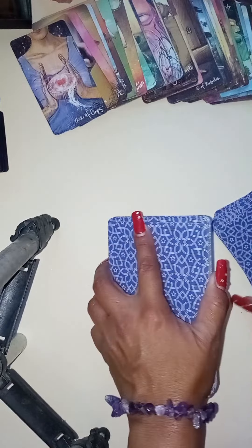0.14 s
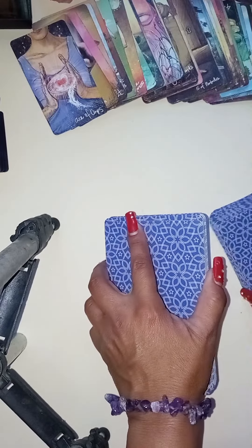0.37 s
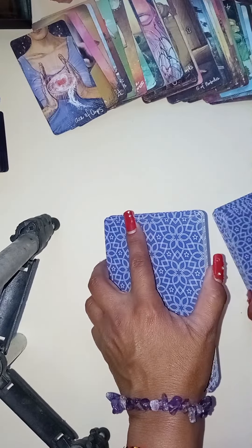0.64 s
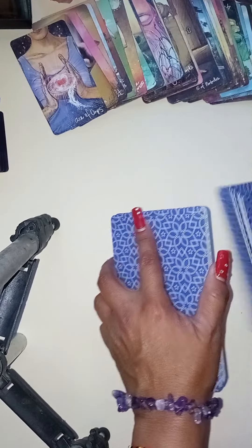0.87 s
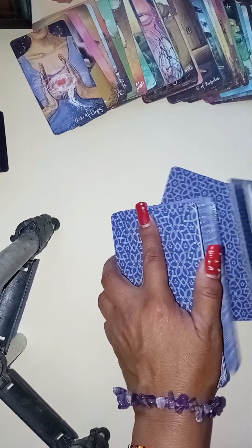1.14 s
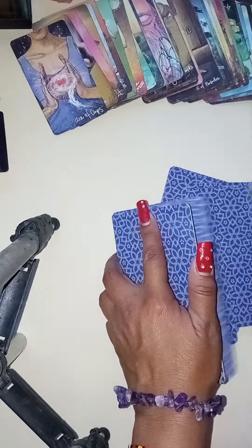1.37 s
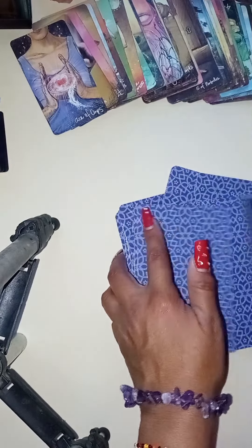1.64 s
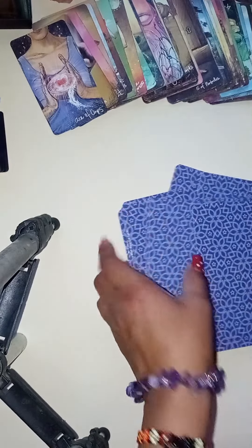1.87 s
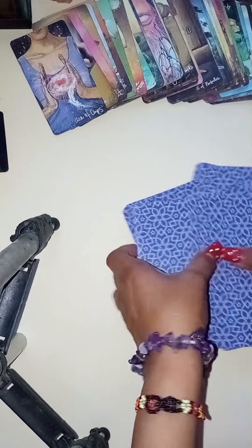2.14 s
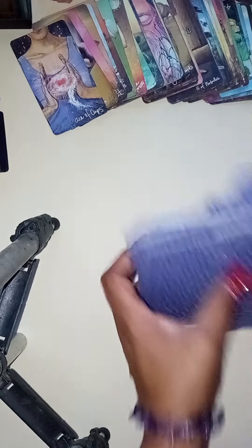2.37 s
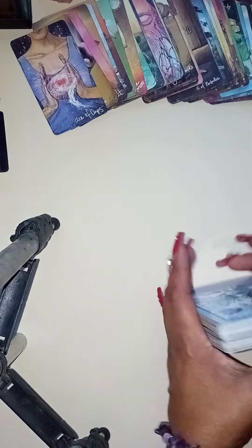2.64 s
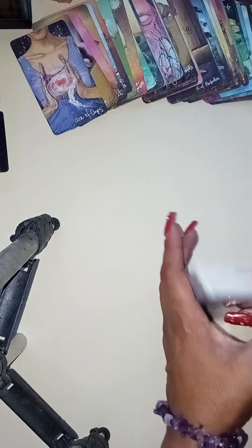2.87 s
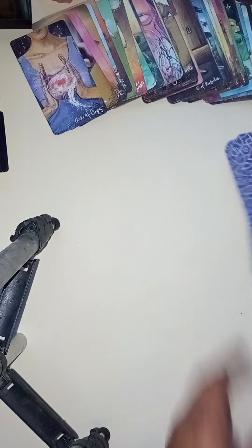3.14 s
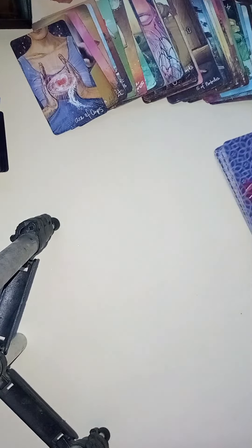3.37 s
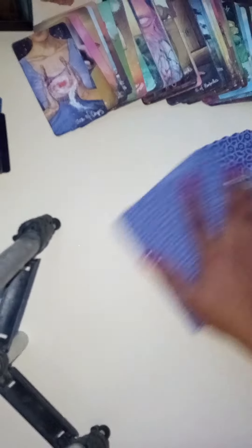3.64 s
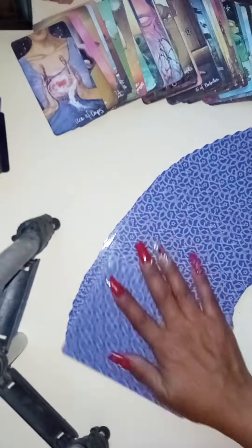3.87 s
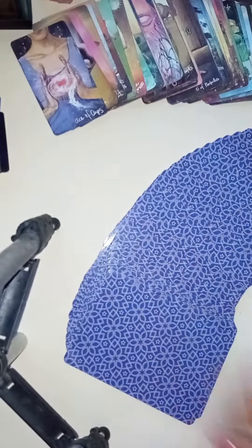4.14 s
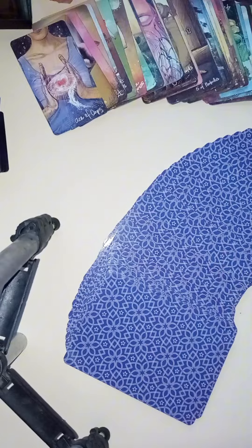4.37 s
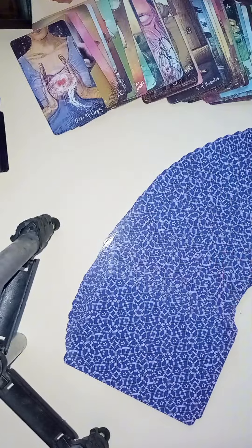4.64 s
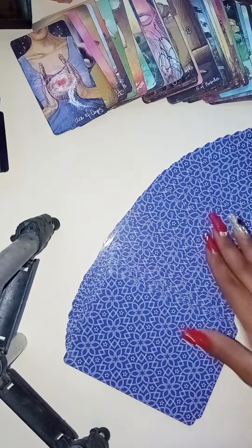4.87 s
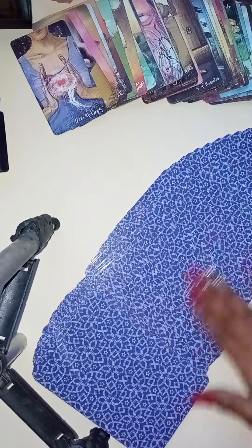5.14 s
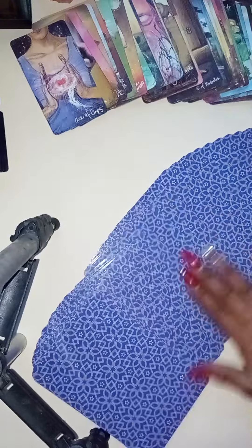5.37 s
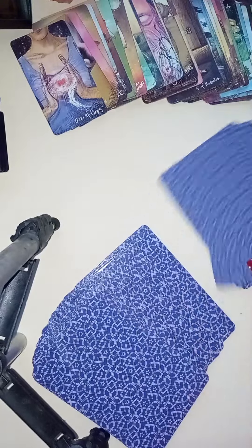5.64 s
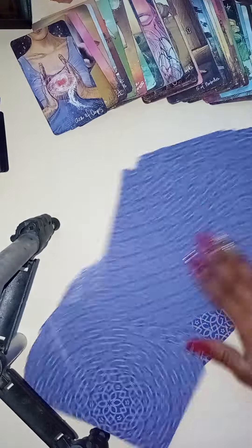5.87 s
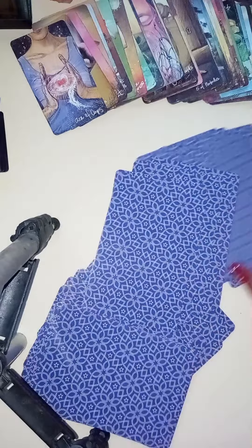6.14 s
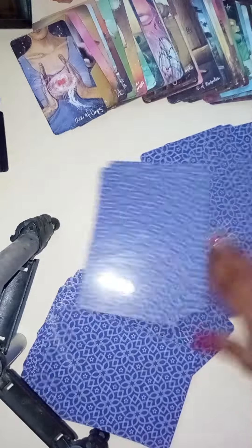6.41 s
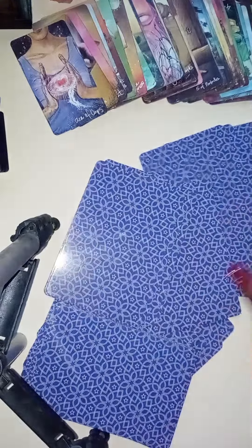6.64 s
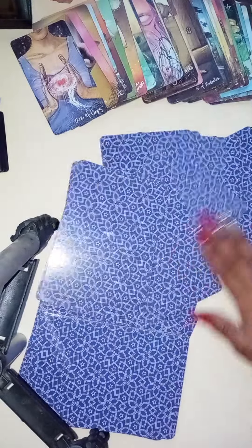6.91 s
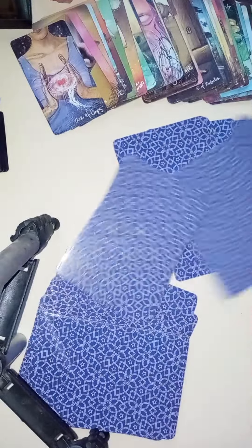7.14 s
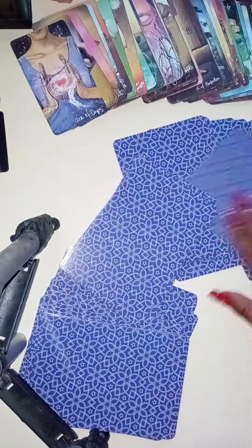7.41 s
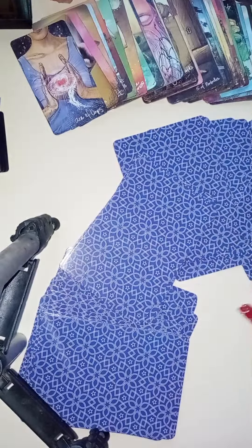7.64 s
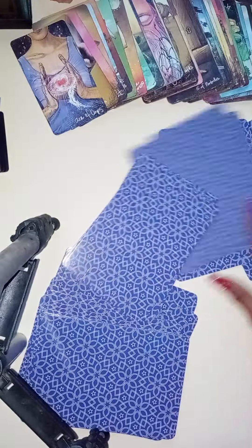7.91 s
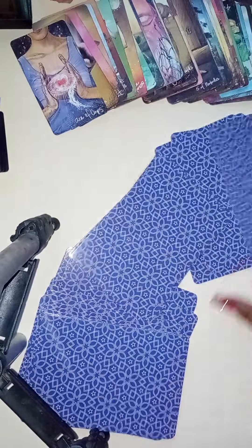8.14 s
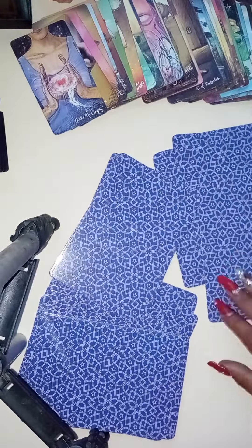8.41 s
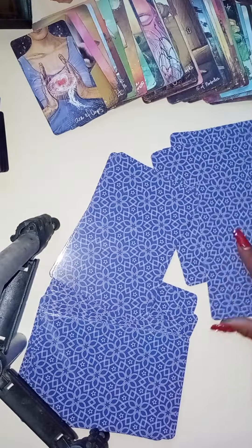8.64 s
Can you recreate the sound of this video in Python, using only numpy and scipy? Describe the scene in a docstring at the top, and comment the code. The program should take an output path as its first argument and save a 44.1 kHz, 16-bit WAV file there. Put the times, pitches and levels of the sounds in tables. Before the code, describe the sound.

A small parakeet chirps, warbles and squawks across a hard, echoing room while a card deck is knocked square, swept and fanned on a table close by.

```python
"""A faint room hush and hum come first; then a small parakeet warbles, buzzes and squawks across a hard room.
Close by, a card deck is riffled, squared against the table and fanned out; the table top booms under knocks.
The bird is made of gliding tones and, for its squawks, rough noise; the rubbing cards are bursts of
gritty noise; each knock sets decaying tones ringing; the hush is shaped noise and the hum a steady tone."""
import sys
import numpy as np
from scipy import signal
from scipy.fft import rfft, irfft
from scipy.io import wavfile
from scipy.ndimage import uniform_filter1d

SR = 44100
rng = np.random.default_rng(int(sys.argv[2]) if len(sys.argv) > 2 else 0)


def boost(x):
    """Linear amplitude factor 10**(x/20) for a level x in decibels (scalar or array-like)."""
    u = np.asarray(x, float) / 20
    return 10 ** u


def wav_record(signal):
    """Record a signal, one row per channel, as 16-bit PCM in the file named by sys.argv[1]."""
    frames = np.transpose(np.atleast_2d(signal))
    bounded = np.clip(frames, -1, 1)
    # unit amplitude maps onto the largest positive 16-bit level
    quanta = np.round(bounded * 32767).astype(np.int16)
    wavfile.write(sys.argv[1], SR, quanta)


N = 386757
TIME = np.arange(N) / SR  # seconds

# Swoops glide straight, loudest on arrival, then are held and fade:
# (start [s], glide [s], held [s], from pitch [Hz], to pitch [Hz], level on arrival [dB])
SWOOPS = [(0.25, 0.051, 0.27, 3150, 2620, -34.5), (0.492, 0.041, 0.0014, 4290, 3370, -31.5),
          (.548, 0.025, 0.012, 4300, 5030, -36), (0.583, 0.035, 0.018, 4960, 3880, -28.5),
          (1.765, 0.025, 0.066, 3400, 3633, -28), (2.045, 0.0093, 0.001, 5650, 3650, -28.5),
          (2.361, 0.046, 0.095, 4785, 3818, -27.5), (2.713, 0.039, 0.13, 3500, 2834, -35),
          (2.886, 0.063, 0.0022, 4360, 3810, -41.5), (3.095, 0.062, 0.0015, 2853, 3270, -38),
          (3.14, 0.017, 0.004, 2890, 4645, -23), (3.169, 0.025, 0.02, 5190, 3970, -31.5),
          (3.794, 0.04, 0.0021, 2448, 3230, -25), (4.386, 0.021, 0.0025, 2630, 1675, -42.5),
          (4.896, 0.051, 0.016, 4640, 3380, -39), (4.966, 0.042, 0.033, 5110, 4295, -35.5),
          (5.351, 0.037, 0.019, 4085, 3406, -37.5), (5.412, 0.058, 0.023, 4800, 3916, -32.5),
          (5.66, 0.051, 0.0018, 4120, 2770, -30), (5.788, 0.0093, 0.003, 2700, 5100, -35)]
# Steps swell high, drop quickly and settle low:
# (start [s], drop [s], end [s], high pitch [Hz], low pitch [Hz], level at the drop [dB])
STEPS = [(1.503, 1.591, 1.7, 4360, 3253, -23), (1.86, 1.875, 2.0, 3583, 2942, -30.5),
         (2.077, 2.122, 2.27, 3992, 2787, -30), (2.945, 2.959, 3.07, 3673, 2808, -26.5),
         (4.327, 4.342, 4.37, 3810, 2470, -41), (4.42, 4.424, 4.458, 3590, 2450, -36.5),
         (6.882, 6.979, 7.09, 4203, 3410, -26.5)]
# Arches climb to a crest in pitch and level, flick upward and sink back:
# (start [s], crest [s], start pitch [Hz], crest pitch [Hz], flick above it [Hz], level at the crest [dB])
ARCHES = [(.858, 0.921, 3550, 3732, 813.5, -23.5), (1.16, 1.28, 3300, 3830, 938.5, -21.5),
          (3.407, 3.485, 2794, 3400, 90, -27.5), (6.21, 6.284, 3243, 3670, 8, -24.5),
          (6.567, 6.682, 3360, 3715, 990.5, -21)]
# Pips start at full level and die away on one pitch: (start [s], length [s], pitch [Hz], first level [dB])
PIPS = [(.325, 0.054, 2026, -39.5), (1.057, 0.13, 2513, -33.5), (1.86, 0.03, 4260, -30),
        (2.915, 0.12, 2530, -31.5), (3.712, 0.04, 2883, -32.5), (3.824, 0.014, 3717, -17),
        (4.455, 0.064, 2363, -40), (5.706, 0.05, 2735, -30), (6.208, 0.041, 2416, -36.5)]
# Faint overtones of the bird's voice: (multiple of the pitch [times], level against the main tone [dB])
OVERTONES = [(2, -35), (3, -46)]
# Buzzy notes; the swings can pass a little beyond the band:
# (start [s], end [s], bottom of band [Hz], top of band [Hz], level before it breaks up [dB])
BUZZES = [(.81, 0.958, 2037, 3890, -38), (1.395, 1.5, 2067, 4095, -35.5), (1.869, 1.964, 2003, 3040, -41.5),
          (2.675, 2.795, 2677, 3515, -28), (3.276, 3.348, 1990, 3040, -36),
          (3.613, 3.68, 2250, 3263, -36.5), (3.959, 4.03, 2330, 3173, -34.5),
          (4.864, 4.906, 1610, 2623, -47.5), (5.664, 5.835, 1864, 4210, -39.5),
          (6.12, 6.152, 1808, 4085, -39)]
# Harsh calls: (start [s], swell [s], fade [s], level [dB])
SQUAWKS = [(0.629, 0.037, 0.046, -15.5), (2.477, 0.014, 0.069, -18.5), (4.184, 0.031, 0.049, -16.5),
           (5.871, 0.026, 0.073, -16), (6.258, 0.037, 0.064, -18.5)]
# Broad bands of the open throat: (frequency [Hz], relative level [dB])
THROAT = [(1300, -46), (2000, -16.5), (3800, -7.5), (5300, -2.5), (6500, 1), (7600, -16), (10000, -18),
          (12500, -41)]
# Cards rubbing over cards and table:
# (loudest [s], speeding up [s], slowing down [s], level [dB], hand weight: scrape against hiss [dB])
SLIDES = [(1.379, 0.12, 0.39, -43, -20.5), (1.769, 0.021, 0.29, -45.5, -19.5), (2.225, 0.05, 0.068, -44, 6),
          (2.658, 0.056, 0.17, -34.5, 6), (3.36, 0.089, 0.24, -40.5, 1), (3.859, 0.25, 0.14, -27.5, -4),
          (5.17, 0.16, 0.072, -34, -2), (5.598, 0.108, 0.28, -43, -20), (6.219, 0.0634, 0.08, -47.5, -13),
          (6.499, 0.085, 0.048, -36.5, 1), (6.829, 0.092, 0.043, -31, -12.5), (7.16, 0.087, 0.12, -35, -12),
          (7.6, 0.134, 0.12, -49.5, -41), (7.652, 0.037, 0.049, -42, 5.5), (8.06, 0.1, 0.048, -40.5, -26.5),
          (8.38, 0.14, 0.094, -43, -14), (8.71, 0.084, .14, -50, -7.5)]
# Colour of the rubbing hiss: (frequency [Hz], relative level [dB])
RUB = [(500, -15), (1200, -30), (3000, -10.5), (6500, -10), (10000, -15.5), (12500, -34), (15000, -29.5)]
# Card edges and fingers striking; relative levels: (time [s], knock [dB], table boom [dB], edge tick [dB])
TAPS = [(1.073, -21.5, -22.5, -35.5), (1.255, -26, -60.5, -37), (1.327, -10.5, -46, -23.5),
        (1.371, -6.5, -9, -16), (1.382, -9, -12.5, -33.5), (1.405, -34, -35.5, -34.5),
        (1.462, -15.5, -27.5, -26.5), (1.576, -8, -59, -26.5), (1.625, -28, -46, -18),
        (1.729, -16.5, -16, -36), (1.861, -58, -42, -18.5), (2.095, -18.5, -28, -45),
        (2.321, -30.5, -63, -26), (2.354, -32.5, -48, -24.5), (2.623, -8.5, -7, -25.5),
        (2.667, -15, -10.5, -49.5), (2.821, -21.5, -16, -73.5), (2.836, -15.5, -46.5, -37),
        (3.39, -19, -39.5, -39.5), (3.497, -20, -6.5, -85), (5.045, -67, -26, -25),
        (5.201, -11.5, -31.5, -60.5), (5.429, -59, -57, -28), (5.92, -17.5, -41, -45),
        (6.2, -55, -28.5, -71.5), (6.496, -10.5, -31.5, -23), (6.855, -20, -30, -26.5),
        (7.482, -49.5, -21.5, -38), (7.62, -22, -41, -30.5), (7.947, -59, -39, -40),
        (8.006, -27, -80.5, -30), (8.124, -20.5, -43.5, -27.5), (8.249, -45, -29, -33.5),
        (8.706, -21.5, -29.5, -22.5)]
# Ringing tones of the deck, before each grip shifts them:
# (frequency [Hz], level [dB], time to fall 60 dB [s])
DECK = [(310, -8.5, 0.04), (706, -3, 0.016), (1179, 3.5, 0.013), (1630, 11.5, 0.008)]
# Ringing tones of the table top: (frequency [Hz], level [dB], time to fall 60 dB [s])
TABLE = [(126.35, 6.5, 0.22), (143.2, -10.5, 0.42), (241.2, -19, 0.16)]
# What of the table reaches the phone through its stand: (frequency [Hz], level [dB])
STAND = [(45, -33), (100, -1)]
# Hands resting and moving on the table top: (time [s], table murmur [dB], stand rumble [dB])
HANDS = [(0.0, -51, -55), (2.66, -45.5, -58.5), (3.76, -42.5, -46.5), (6.45, -58, -79), (6.67, -45, -62.5),
         (7.45, -57.5, -65.5), (8.33, -43.5, -69), (8.77, -64, -77.5)]
# Colour of the room hush: (frequency [Hz], relative level [dB])
HUSH = [(30, -51.5), (70, -22.5), (200, -19), (650, -24), (800, -30), (4000, -46), (10000, -54),
        (15000, -58)]
# Mains overtones heard as hum: (frequency [Hz], level [dB])
HUM = [(600, -71)]


def unit(x):
    """Scale to an average strength (rms) of 1."""
    return x / np.sqrt(np.mean(x ** 2))


def colour(x, points):
    """Shape the balance of low and high by (frequency [Hz], level [dB]) points, joined on a log scale."""
    hz, db = np.transpose(points)
    gain_db = np.interp(np.log(np.fft.rfftfreq(N, 1 / SR) + 1), np.log(hz), db)
    return irfft(rfft(x) * boost(gain_db), N)


def ring(x, modes):
    """An object rings as a sum of decaying tones; a pulse of size 1 starts each at its own level."""
    out = 0
    for hz, db, t60 in modes:
        pole = np.exp(2j * np.pi * hz / SR - np.log(1000) / (t60 * SR))
        out = out + boost(db) * signal.lfilter([1], [1, -pole], x).imag
    return out


def walk(rate):
    """Smooth random wandering with spread 1; it changes about rate times a second."""
    k = int(SR / rate)
    smooth = uniform_filter1d(rng.standard_normal(N), k)
    return unit(uniform_filter1d(smooth, k))


def grit(spread_db):
    """Noise whose samples differ widely in size: many small catches, a few sharp ones."""
    size = np.minimum(rng.exponential(size=N), 7)
    return unit(rng.standard_normal(N) * boost(spread_db * size))


def whistles():
    """A nearly pure syrinx tone with faint overtones; pitch and pressure tremble, the air rasps."""
    out, tremble, flutter = np.zeros(N), walk(210), walk(230)
    rasp = 1 + 0.15 * walk(1200)
    for t, hz, db in song():
        start = round(t[0] * SR)
        at = slice(start, start + len(t))
        phase = 2 * np.pi * np.cumsum(hz * (1 + 0.0044 * tremble[at])) / SR
        tone = np.sin(phase) + sum(boost(d) * np.sin(k * phase) for k, d in OVERTONES)
        # short ramps in and out [s] avoid clicks
        edges = np.clip(np.minimum((t - t[0]) / 0.0017, (t[-1] - t) / 0.0065), 0, 1)
        flutter_db = 4.5 * flutter[at]
        out[at] += np.sqrt(2) * tone * rasp[at] * edges * boost(db + flutter_db)
    return out


def song():
    """Times, pitch and level of every whistled note, by the rule of its kind."""
    yield from swoops()
    yield from steps()
    yield from arches()
    yield from pips()


def swoops():
    """Pitch glides straight as the level swells; then it sags while the sound fades."""
    swell_db, fade_db_per_s, sag_hz_per_s = 5.5, 141.5, 1750
    for s, glide, held, from_hz, to_hz, db in SWOOPS:
        t = TIME[int(s * SR):int((s + glide + held) * SR)]
        way = np.clip((t - s) / glide, 0, 1)
        after = np.clip(t - s - glide, 0, 1)
        hz = from_hz + (to_hz - from_hz) * way - sag_hz_per_s * after
        yield t, hz, db - swell_db * (1 - way) - fade_db_per_s * after


def steps():
    """A high pitch swells, then falls along a curve to the low pitch while the sound fades."""
    swell_db_per_s, drop_s, fade_db_per_s = 172, 0.029, 81
    for s, drop, end, high_hz, low_hz, db in STEPS:
        t = TIME[int(s * SR):int(end * SR)]
        before = np.clip(drop - t, 0, 1)
        after = np.clip(t - drop, 0, 1)
        hz = low_hz + (high_hz - low_hz) * np.exp(-(after / drop_s) ** 1.2)
        yield t, hz, db - swell_db_per_s * before - fade_db_per_s * after


def arches():
    """Pitch and level climb to a crest; a brief upward flick follows, then both sink."""
    climb_db_per_s, fade_db_per_s, flick_s, sink_s = 155, 30, 0.0089, 0.04
    sink_share, sunk_db, sunk_s = 0.13, -8.5, 0.14  # share of the pitch lost, level change, time after crest
    for s, crest, start_hz, crest_hz, flick_hz, db in ARCHES:
        t = TIME[int(s * SR):int((crest + sunk_s) * SR)]
        before = np.clip(crest - t, 0, 1)
        after = np.clip(t - crest, 0, 1)
        flick = np.clip(1 - abs(after / flick_s - 1), 0, 1)
        sunk = 1 - np.exp(-(after / sink_s) ** 2.4)
        climb_hz = (crest_hz - start_hz) * before / (crest - s)
        hz = crest_hz * (1 - sink_share * sunk) - climb_hz + flick_hz * flick
        fall_db = sunk_db * np.clip(after / flick_s, 0, 1) - fade_db_per_s * after
        yield t, hz, db - climb_db_per_s * before + fall_db


def pips():
    """A steady pitch dies away evenly."""
    fade_db_per_s = 129.5
    for s, length, hz, db in PIPS:
        t = TIME[int(s * SR):int((s + length) * SR)]
        yield t, hz + 0 * t, db - fade_db_per_s * (t - s)


def buzzes():
    """The syrinx tone lurches across a band in quick uneven swings and breaks up in level."""
    swing = np.clip(0.5 * walk(250), -1.3, 1.3)
    out = np.zeros(N)
    for start, end, low_hz, high_hz, db in BUZZES:
        at = slice(int(start * SR), int(end * SR))
        hz = low_hz + (high_hz - low_hz) * (1 + swing[at]) / 2
        phase = 2 * np.pi * np.cumsum(hz) / SR
        tone = np.sin(phase) + boost(OVERTONES[0][1]) * np.sin(2 * phase)
        # the tiny power leaves the note flat but for its very ends
        out[at] += boost(db) * np.hanning(len(phase)) ** 0.015 * tone
    return np.sqrt(2) * out * boost(5.1 * walk(200))


def squawks():
    """The syrinx flaps chaotically; the open throat picks out broad bands."""
    effort = np.zeros(N)
    for s, rise, fade, db in SQUAWKS:
        swell = np.clip((TIME - s) / rise, 0, 1) ** 2
        effort += boost(db) * swell * np.exp(-np.clip((TIME - s - rise) / fade, 0, 9) ** 2)
    flapping = grit(2.6) * boost(5 * walk(300))
    return effort * unit(colour(flapping, THROAT))


def slides():
    """Paper grain catches: hiss in spurts as card after card lets go; a heavier hand adds the low scrape."""
    hiss = np.zeros(N)
    # each band of the hiss surges on its own
    for hz in 700 * 2 ** np.arange(0, 5, 0.7):
        band = colour(grit(3.6), [(hz / 2, -20), (hz, 0), (2 * hz, -20)])
        hiss += band * boost(4 * walk(45))
    hiss = unit(colour(hiss, RUB)) * boost(2.5 * walk(60))
    scrape = colour(grit(1.0), [(250, -7.5), (600, -12.5), (1300, 3.5), (3500, 7.0), (7000, -24.5)])
    scrape = unit(scrape) * boost(3.06 * walk(46))
    out = np.zeros(N)
    for s, rise, fall, db, weight_db in SLIDES:
        loudness = np.interp(TIME, [s - rise, s, s + fall], [0, 1, 0]) ** 0.57  # follows the hand's speed
        out += boost(db) * loudness * (hiss + boost(weight_db) * scrape)
    return out


def taps():
    """Each strike: a bright tick, the short knock of the deck with its bounces, the slow boom of the table."""
    deck_db, edge_db = -25, 5.5  # how much of a strike enters the deck and the card edges
    knock, boom, tick = np.zeros((3, N + 4096))  # spare room for the last strike
    t = TIME[:220]
    burst = np.exp(-t / 0.0034) * np.clip(t / 0.00013, 0, 1)
    push = burst * np.clip(t / 0.002, 0, 1)  # softer start than the tick
    cracks = rng.standard_normal((len(TAPS), 220))
    chances = rng.random((len(TAPS), 5, 3))
    for (s, knock_db, boom_db, tick_db), crack, chance in zip(TAPS, cracks, chances):
        boom[int(s * SR)] += boost(boom_db)
        # taking away the average leaves the blow no net push
        blow = np.pad(push * (crack - push @ crack / push.sum()), (0, 1828))
        # five bounces: up to 0.04 s late, 10 to 24 dB weaker, each with its own grip
        bounces = chance * (0.04, -14, 1) - (0, 10, 0)
        for lag, loss_db, grip in [(0, 0, chance[0, 2]), *bounces]:
            i = int((s + lag) * SR)
            # each grip on the deck shifts its tones
            held = [(hz * (0.68 + 0.5 * grip), db, t60) for hz, db, t60 in DECK]
            knock[i:i + 2048] += boost(knock_db + loss_db) * ring(blow, held)
            tick[i:i + 220] += boost(tick_db + 2 * loss_db) * burst * crack[::-1]
    # the soft hand pushes for some milliseconds, so the boom has no click
    palm = np.hanning(int(0.0062 * SR))
    boom = np.convolve(boom, palm / palm.sum())[:N]
    edges = colour(tick[:N], [(1500, -7.5), (6000, 4.0), (12000, -15.0)])
    clicks = boost(deck_db) * knock[:N] + boost(edge_db) * edges
    return clicks, ring(boom, TABLE)


def hands():
    """Hands on the table stir its ringing tones as a murmur and the stand as a low rumble."""
    s, table_db, stand_db = np.transpose(HANDS)
    stirring = rng.standard_normal(N) * boost(0.91 * walk(9.6))
    murmur = unit(colour(ring(stirring, TABLE), STAND))
    rumble = unit(colour(rng.standard_normal(N), [(20, -60.5), (55, 0.5), (90, -44.5), (200, -91)]))
    return murmur * boost(np.interp(TIME, s, table_db)) + rumble * boost(np.interp(TIME, s, stand_db))


def hush():
    """Room hush: soft noise, strongest in the lows, whose level wavers slightly."""
    level_db = -60 + 0.26 * walk(16)
    return boost(level_db) * unit(colour(rng.standard_normal(N), HUSH))


def hum():
    """Mains hum: steady pure tones."""
    return sum(np.sqrt(2) * boost(db) * np.sin(2 * np.pi * hz * TIME) for hz, db in HUM)


def room(x, wet_db):
    """Hard walls add a dense tail of echoes to the direct sound; its treble dies first."""
    t60_s, treble_t60_s = 0.28, 0.23  # time to fall 60 dB
    t = TIME[:SR // 2]
    noise = rng.standard_normal(len(t))
    low = signal.sosfilt(signal.butter(3, 7600, fs=SR, output="sos"), noise)
    tail = low * np.exp(-np.log(1000) * t / t60_s)
    tail += (noise - low) * np.exp(-np.log(1000) * t / treble_t60_s)
    tail *= np.clip(t / 0.0025, 0, 1)  # the echoes build up over 2.5 ms
    return x + boost(wet_db) * signal.fftconvolve(x, tail / np.linalg.norm(tail))[:N]


def scene():
    """Far bird with much room sound, near cards with little, and the table through the stand."""
    bird = whistles() + buzzes() + squawks()
    clicks, boom = taps()
    cards = slides() + clicks
    background = hands() + hush() + hum()
    return (room(bird, 5.5) + room(cards, -5.5) + colour(boom, STAND) + background)[None]


def top_cut(x):
    """Nothing passes above the cut-off."""
    return signal.sosfilt(signal.butter(12, 17070, fs=SR, output="sos"), x)


def record(dry):
    """Peaks are rounded; the top edge of the treble is lifted, then cut."""
    top = 0.9  # the rounded peaks level off here, before the treble is shaped
    rounded = top * np.tanh(dry[0] / top)
    finished = colour(rounded, [(13500, 2.5), (15000, 8.0), (15800, 6), (16100, -30)])
    return top_cut(finished[None])


dry = scene()
out = record(dry)
wav_record(out)
```